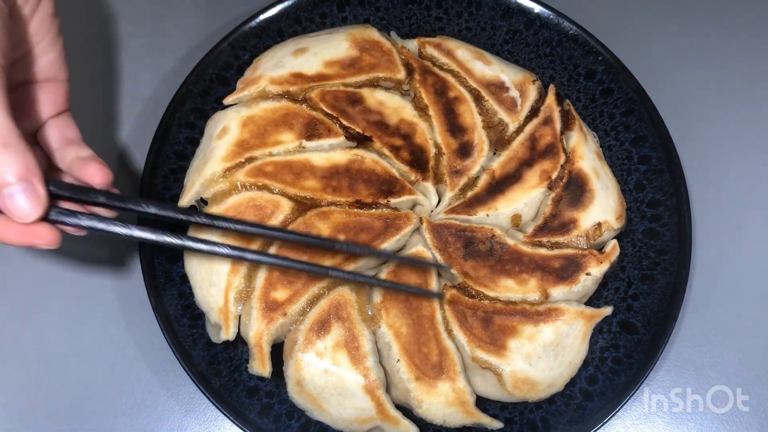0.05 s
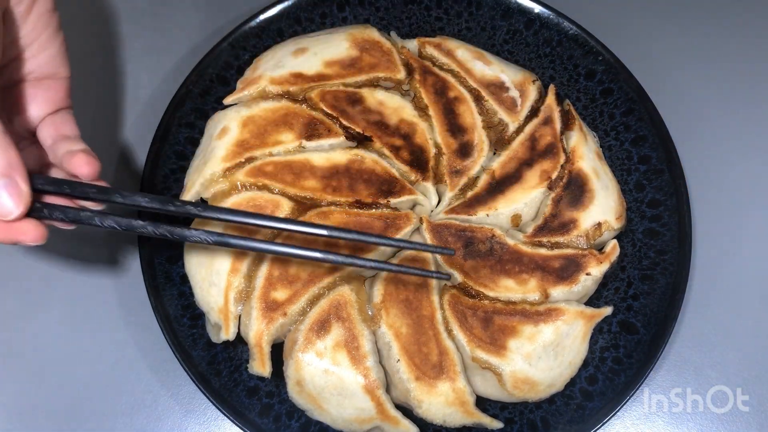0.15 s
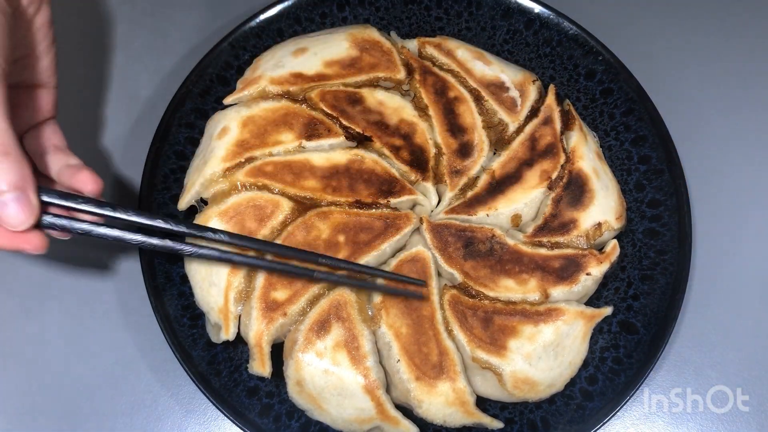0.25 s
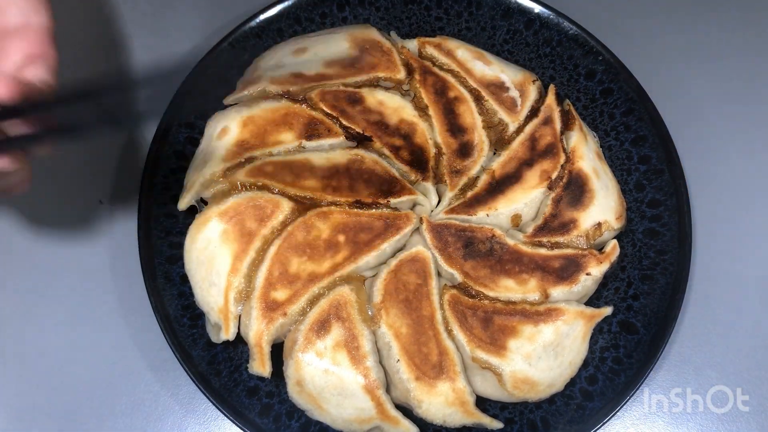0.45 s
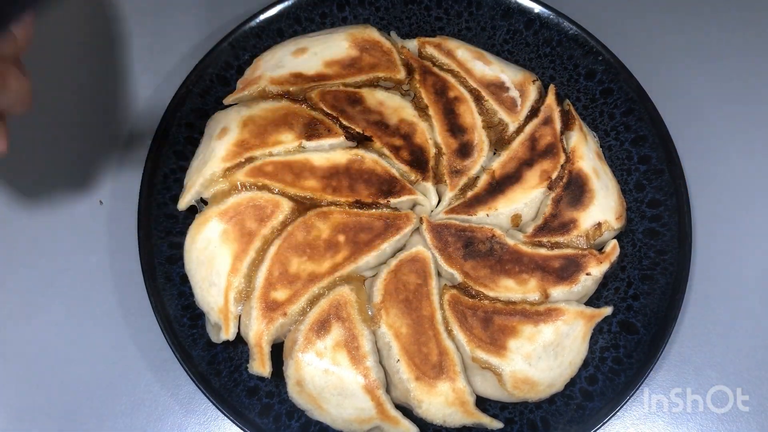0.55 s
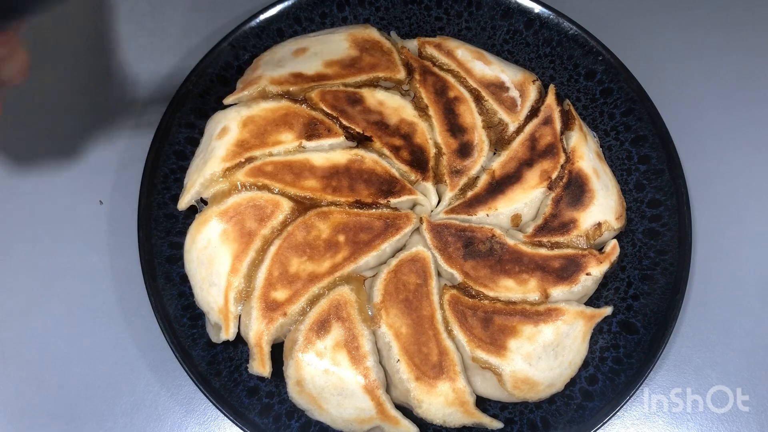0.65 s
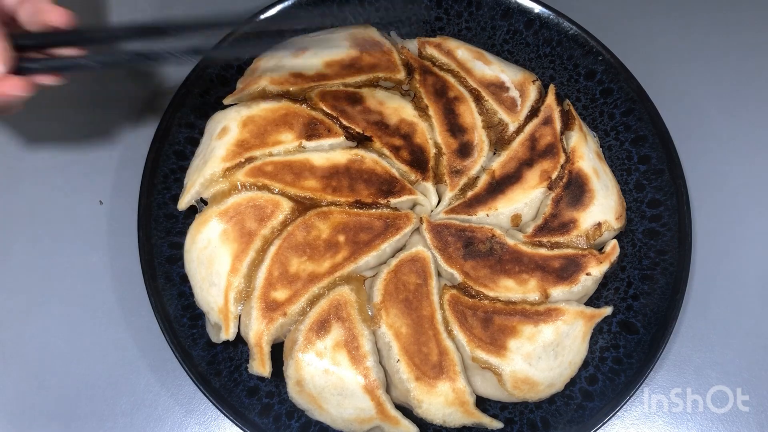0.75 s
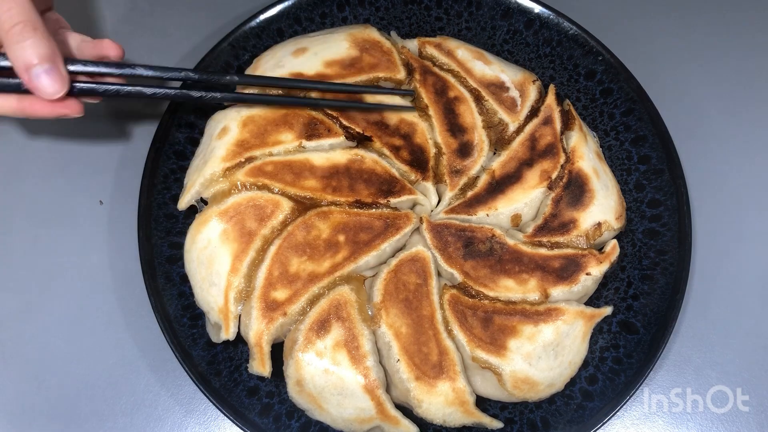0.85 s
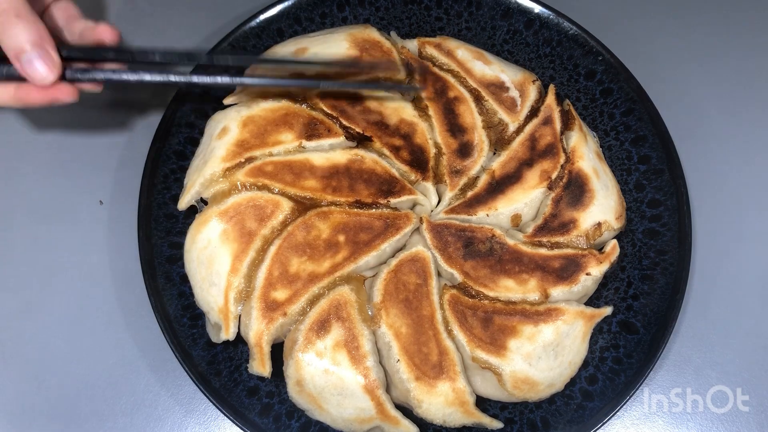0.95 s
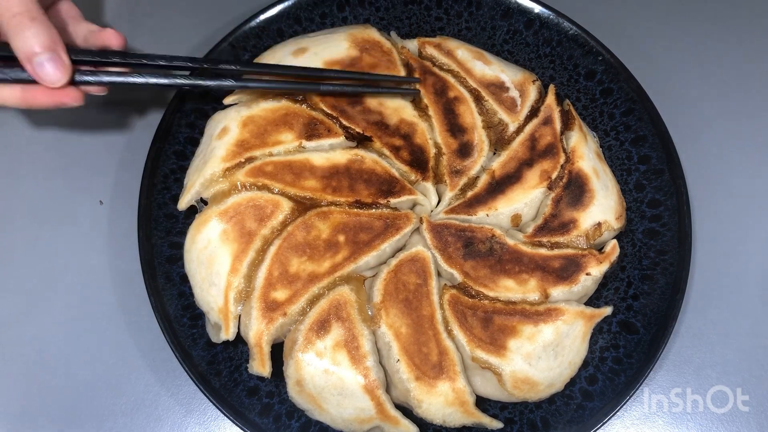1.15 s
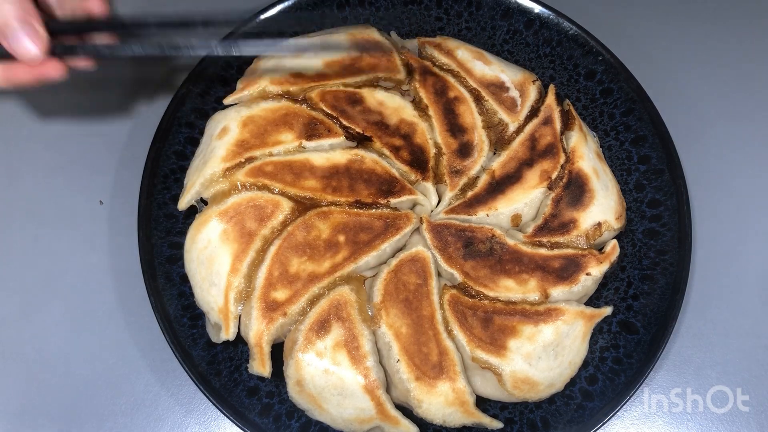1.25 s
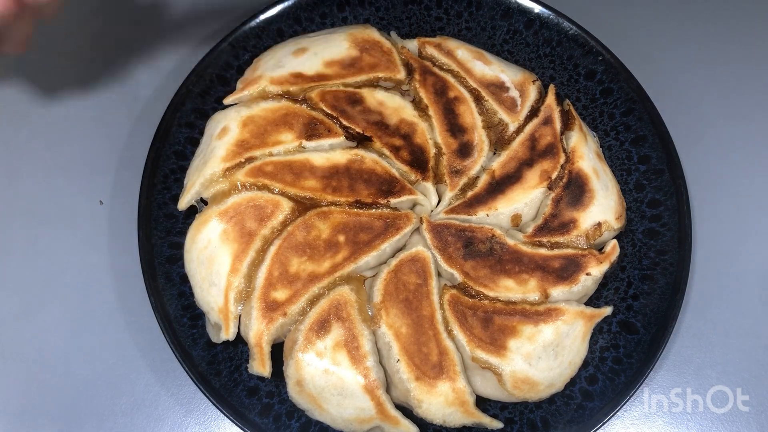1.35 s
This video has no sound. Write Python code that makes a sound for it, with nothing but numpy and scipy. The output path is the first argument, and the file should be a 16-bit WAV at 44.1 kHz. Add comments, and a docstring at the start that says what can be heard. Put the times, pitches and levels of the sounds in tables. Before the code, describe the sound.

Chopsticks knock tips-down on a table right at the start and again at 0.2 seconds, each a sharp, hollow crack with a slight low thud. The sticks click together brightly at 0.3 and 0.4 seconds. A third knock at 0.8 brings a brief dry rattle and softer clicks. A fourth lands at 1.1, followed by two faint clicks. Everything is close, in a small, quiet room.

```python
"""A pair of chopsticks is knocked tips-down on a table beside a ceramic plate, close by, in a small,
quiet room. Two knocks come first: both tips land almost at once, with a sharp crack over a short hollow
note and a low boom of the tabletop. Then the sticks click together twice and ring brightly. At the
third knock the tips bounce with a brief, dry rattle, and there are two softer clicks. A fourth knock
and two faint clicks end the scene."""
import sys
import numpy as np
from scipy import signal
from scipy.fft import rfft, irfft, next_fast_len
from scipy.io import wavfile

SR = 44100
rng = np.random.default_rng(int(sys.argv[2]) if len(sys.argv) > 2 else 0)


def master(y):
    """Save y as 16-bit WAV."""
    cut = np.clip(np.atleast_2d(y).T, -1, 1)
    pcm = np.round(cut * 32767)  # scale
    wavfile.write(sys.argv[1], SR, pcm.astype(np.int16))


N = 61739
LEAD, RING = SR // 10, SR * 3 // 5  # samples: spare time before the start, length of one sound

# The tone of the room's steady hush and of its echo. Each row: frequency in Hz, level in dB.
HUSH_COLOUR = [(25, -26), (55, 2), (80, 1), (120, 3), (160, -8), (280, -2.5), (400, -11), (600, -17),
               (850, -19.5), (2200, -26.5), (12200, -32), (15500, -24.5), (16000, -49.5)]
ECHO_COLOUR = [(100, -4.5), (500, 6), (1300, 0.5), (3000, -2), (8000, 0), (15000, 1)]
# How long the echo lasts. Each row: frequency in Hz, fade time in seconds.
ECHO_FADES = [(100, 0.4), (600, 0.14), (2000, 0.22), (6000, 0.21), (15000, 0.18)]
# The tips bounce after landing. Each row: start in seconds, level in dB.
RATTLE_EVENTS = [(.854, -41), (0.865, -47)]
# The sticks meet. Each row: start in seconds, level in dB, treble tilt in dB per octave, hardness in dB.
CLICK_EVENTS = [(0.2967, -34.5, -1.5, -7), (0.3755, -33.5, 0, -8.5), (0.854, -46, -10, -19),
                (0.9664, -40.5, -6.5, -5.5), (1.1938, -43.5, -6.5, -4.5), (1.2536, -45.5, -19.5, -11.5)]
# The notes of the two bending sticks, some in close pairs: pitches in Hz, then their levels in dB.
STICK_PITCHES = [1680, 2498, 3130, 3780, 4990, 5185, 6610, 6686, 8335, 8520, 10100, 10280, 12295, 14450,
                 14630]
STICK_LEVELS = [-24, -13.5, -17.5, -10, -9, -8.5, -24, 2, -1, -1.5, -4.5, 2, 1.5, 2.5, -11]
# The knocks. Each row: start in seconds, then levels in dB of hollow note, clack, snap and table thud.
KNOCK_EVENTS = [(-.022, -21, -23.5, -32.5, -46), (0.2185, -18.5, -19.5, -24, -45),
                (0.8312, -21.5, -38.5, -28.5, -50), (1.1137, -16, -27.5, -47.5, -47)]
# For each knock, how many seconds the second tip lands after the first.
SECOND_TIP_DELAYS = [.003, .00315, 0, .00546]
# The tone of four short bursts of noise. Each row: frequency in Hz, level in dB.
RATTLE_COLOUR = [(400, -7), (900, -13), (1300, -9), (2200, -6), (2800, -14), (4500, -18), (7000, -17),
                 (15000, -15)]
CONTACT_COLOUR = [(600, -36), (1700, 0), (3000, 3), (7000, 9.5), (9000, 2.5), (11500, -1), (15500, -24)]
CLACK_COLOUR = [(200, -27), (500, -12.5), (830, -3), (1300, -1.5), (2050, 3), (2550, -2.5), (3150, 4.5),
                (3700, -11), (4300, -2), (5300, -4.5), (7200, -4), (10000, -6), (16000, -9.5)]
SNAP_COLOUR = [(1000, -36), (4500, -27.5), (7300, -24.5), (8800, 0), (9700, -13.5), (10600, 1.5),
               (11300, -3), (12400, -0.5), (13300, 1.5), (14600, 6.5), (16000, -12)]
# What rings in a knock. Each row: pitch in Hz, level in dB, fade time in seconds.
TIP_NOTES = [(2105, -3, 0.022), (3275, -7, 0.029), (4270, 0, 0.012), (7100, -9, 0.024)]  # the hard tips themselves
HOLLOW_NOTES = [(436, -12, 0.028), (685, -7, 0.026), (1256, 6.5, 0.012), (1447, -24, 0.0067)]  # the table right under the tips
TABLETOP_NOTES = [(137.8, 4.5, 0.25), (164.5, 11, 0.076), (204, -0.5, 0.058), (269.9, 0.5, 0.13),
                  (346, -6.5, .06), (436, -18, 0.11), (467, -13.5, 0.39), (559, -6, 0.2), (619, -11, 0.36)]  # the tabletop's low hum
SWAY_NOTES = [(75.4, -2, .42)]  # the whole table swaying


def amp(db):
    """Turn decibels into a number to multiply by."""
    return 10 ** (np.asarray(db) / 20)


def along(points, hz):
    """Read values off a curve through (Hz, value) points, with octaves evenly spaced."""
    freqs, values = np.transpose(points)
    return np.interp(np.log(hz + 1), np.log(freqs + 1), values)


def fade(fade_s):
    """Die away smoothly. The fade time is how long it takes to drop by 60 dB."""
    return np.exp(-np.log(1000) * np.arange(RING) / SR / fade_s)


def noise(colour, size=RING):
    """Noise with the given tone, always of the same strength."""
    gain = amp(along(colour, np.fft.rfftfreq(size, 1 / SR)))
    x = irfft(rfft(rng.standard_normal(size)) * gain, size)
    return x / x.std()


def delayed(x, seconds):
    """Start a sound later, keeping it RING samples long."""
    return np.pad(x, (int(seconds * SR), 0))[:RING]


def ring(notes, attack_s, lag_cycles=0):
    """A struck object rings with fading notes, each starting lag_cycles of its own vibrations late."""
    t, x = np.arange(RING) / SR, np.zeros(RING)
    for hz, db, fade_s in notes:
        note = fade(fade_s) * np.sin(2 * np.pi * hz * t) * (1 - np.exp(-t / attack_s))
        strength = amp(db + rng.standard_normal())  # varies by about 1 dB each time
        x += strength * delayed(note, lag_cycles / hz)
    return x


def placed(sounds):
    """Mix (start in seconds, sound) pairs onto one track."""
    track = np.zeros(LEAD + N + RING)
    for start, x in sounds:
        track[LEAD + round(start * SR):][:RING] += x
    return track[LEAD:][:N]


def room_hush():
    """The quiet room's steady noise, mostly a low rumble."""
    return amp(-64.5) * noise(HUSH_COLOUR, N)


def in_room(x, echo_db=-10):
    """Add the room's soft echo, in which each frequency dies at its own speed."""
    hz, t, spectrum = signal.stft(rng.standard_normal(RING), SR, nperseg=256)
    spectrum *= amp(along(ECHO_COLOUR, hz))[:, None]
    spectrum *= np.exp(-np.log(1000) * t / along(ECHO_FADES, hz)[:, None])
    tail = signal.istft(spectrum, SR, nperseg=256)[1]
    tail = np.pad(tail, (int(.004 * SR), 0))  # the echo comes 4 ms late
    return x + amp(echo_db) * signal.fftconvolve(x, tail / np.linalg.norm(tail))[:RING]


def rattle(level_db):
    """The tips bounce after landing, with a brief, dry rattle."""
    return amp(level_db) * in_room(noise(RATTLE_COLOUR) * fade(0.088))


def sticks_ring(tilt_db, middle_fade_s):
    """Both sticks bend and ring; the higher notes die sooner."""
    pitch_ratio = np.array(STICK_PITCHES) / np.median(STICK_PITCHES)
    levels = STICK_LEVELS + tilt_db * np.log2(np.maximum(pitch_ratio, 1))
    fades = middle_fade_s / pitch_ratio ** 0.6
    return ring(zip(STICK_PITCHES, levels, fades), attack_s=.0002)


def click(level_db, tilt_db, hardness_db):
    """Stick meets stick: a burst of noise, then a bright ring."""
    contact = amp(hardness_db) * noise(CONTACT_COLOUR) * fade(.05)
    gripped = sticks_ring(tilt_db, 0.053)  # most of the ring dies in the fingers
    free = amp(-18) * sticks_ring(tilt_db, 0.093)  # a little sings on
    return amp(level_db) * in_room(contact + amp(-6.5) * (gripped + free), echo_db=-10.5)


def knock(gap_s, hollow_db, clack_db, snap_db, thud_db):
    """Two tips hit the table and set it humming; the tiny gap between them colours the knock."""
    lag_cycles = 0.61  # the table's low notes arrive later than its high ones
    tip_ring = amp(-3) * ring(TIP_NOTES, attack_s=.0002)
    clack = amp(clack_db) * (noise(CLACK_COLOUR) * fade(.027) + tip_ring)
    snap = amp(snap_db) * noise(SNAP_COLOUR) * fade(.027)
    hollow = amp(hollow_db) * ring(HOLLOW_NOTES, .003, lag_cycles)
    hum = ring(TABLETOP_NOTES, .003, lag_cycles)
    sway = ring(SWAY_NOTES, .02, lag_cycles)
    thud = amp(thud_db) * (hum + sway)
    first_tip = in_room(clack + snap + hollow) + thud
    second_tip = in_room(clack + snap + hollow) + thud
    return first_tip + amp(-3) * delayed(second_tip, gap_s)


def scene():
    """Knocks, rattles and clicks over the hush of the room, in one channel."""
    knocks = placed((start, knock(gap_s, *levels))
                    for (start, *levels), gap_s in zip(KNOCK_EVENTS, SECOND_TIP_DELAYS))
    rattles = placed((start, rattle(db)) for start, db in RATTLE_EVENTS)
    clicks = placed((start, click(*settings)) for start, *settings in CLICK_EVENTS)
    return (room_hush() + rattles + clicks + knocks)[None]


def record(dry):
    """The recorder cuts away the deepest bass and the highest treble."""
    low_cut_hz, edge_hz, top_hz = 40, 15700, 17100
    dry = signal.sosfilt(signal.butter(4, low_cut_hz, btype="high", fs=SR, output="sos"), dry)
    size = next_fast_len(N + RING)
    hz = np.fft.rfftfreq(size, 1 / SR)
    treble_db = -50 * np.interp(hz, [edge_hz, top_hz], [0, 1]) ** 2
    gain = amp(treble_db) * (hz < top_hz)
    return irfft(rfft(dry, size) * gain, size)[:, :N]


dry = scene()
out = record(dry)
master(out)
```